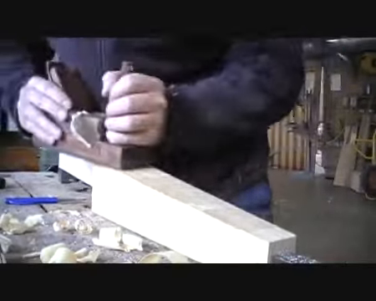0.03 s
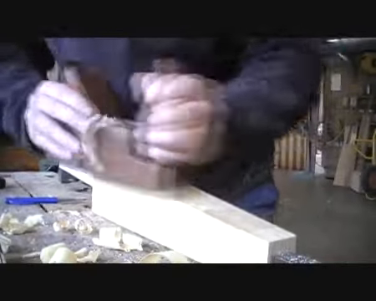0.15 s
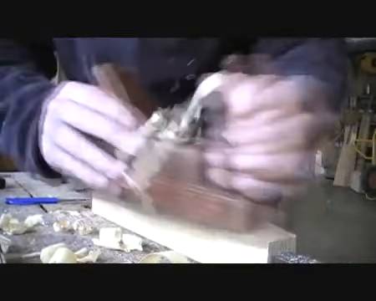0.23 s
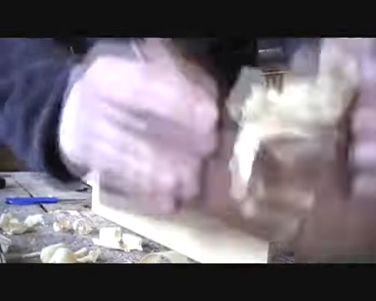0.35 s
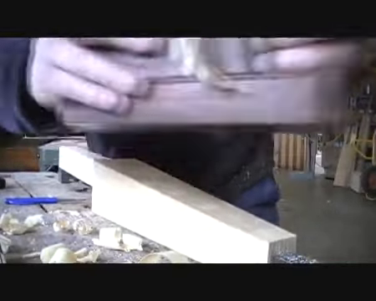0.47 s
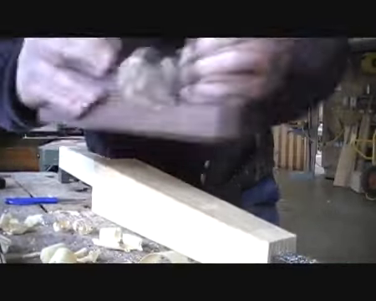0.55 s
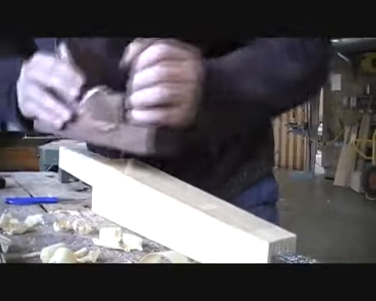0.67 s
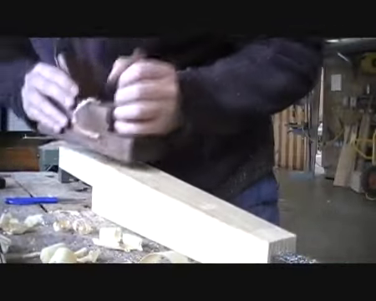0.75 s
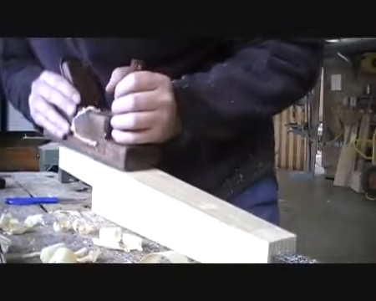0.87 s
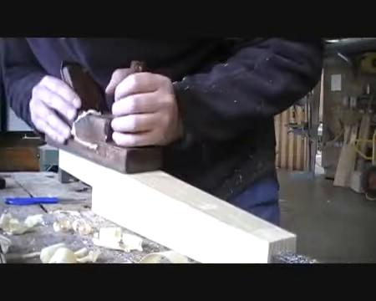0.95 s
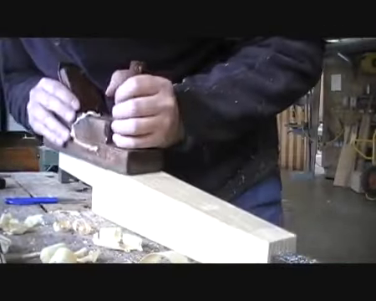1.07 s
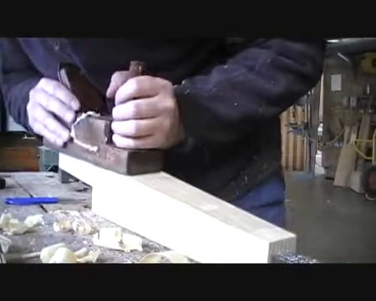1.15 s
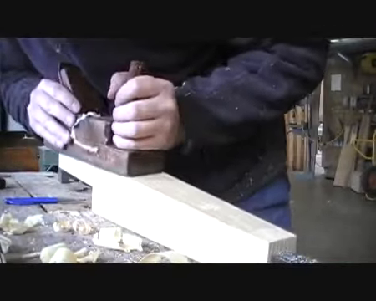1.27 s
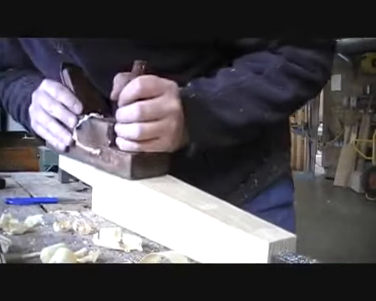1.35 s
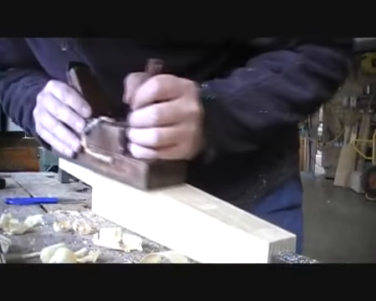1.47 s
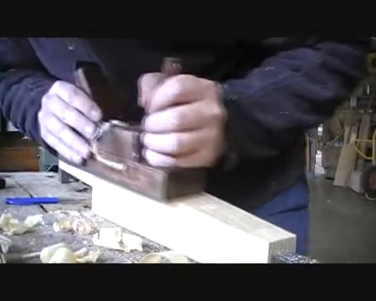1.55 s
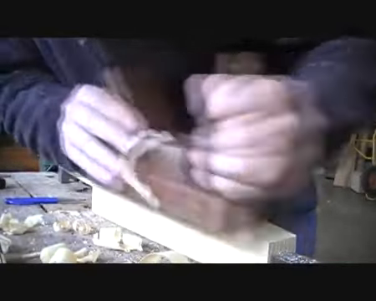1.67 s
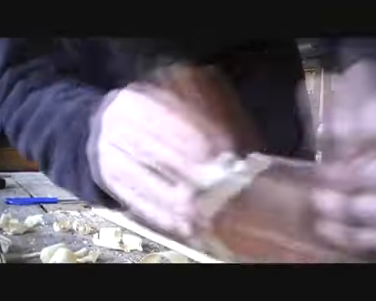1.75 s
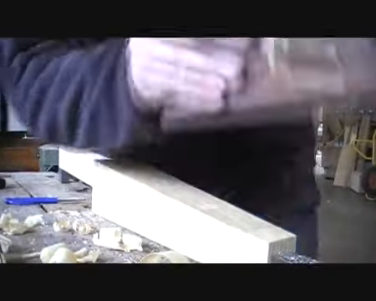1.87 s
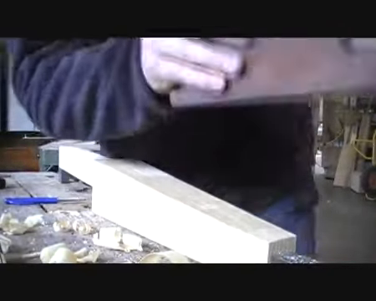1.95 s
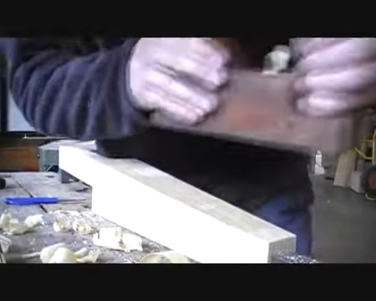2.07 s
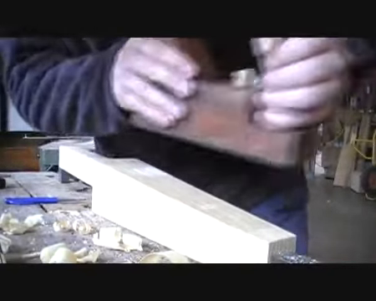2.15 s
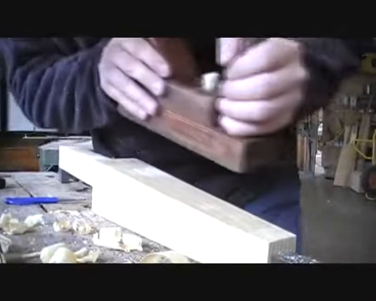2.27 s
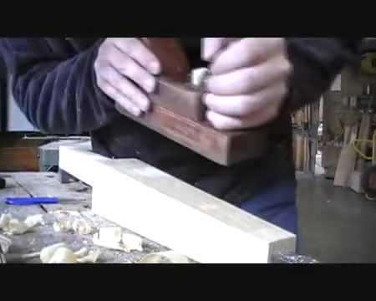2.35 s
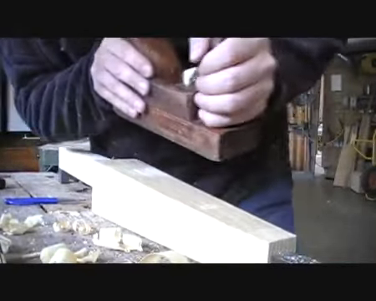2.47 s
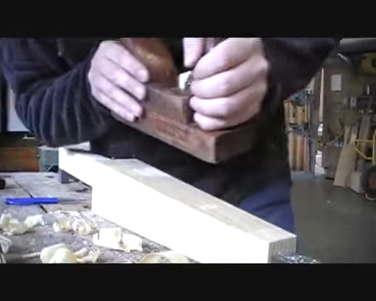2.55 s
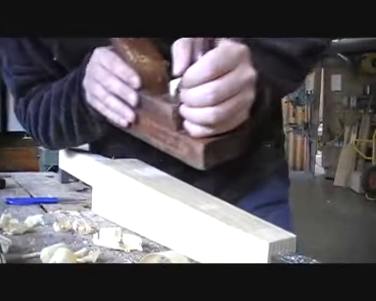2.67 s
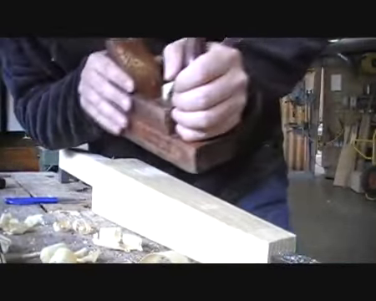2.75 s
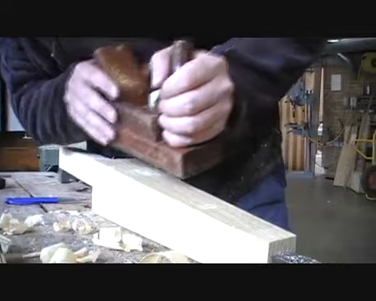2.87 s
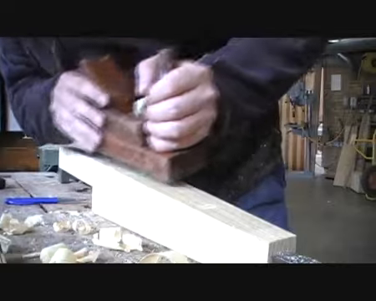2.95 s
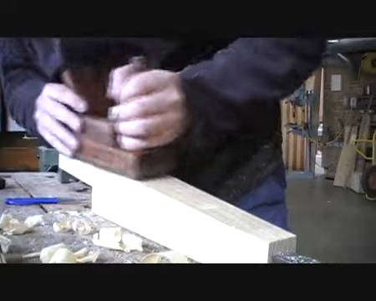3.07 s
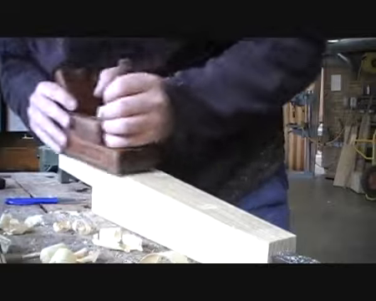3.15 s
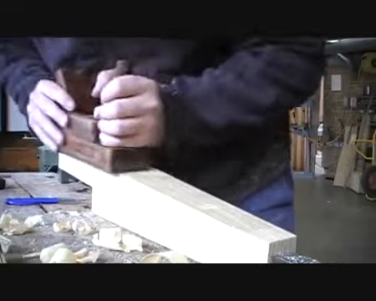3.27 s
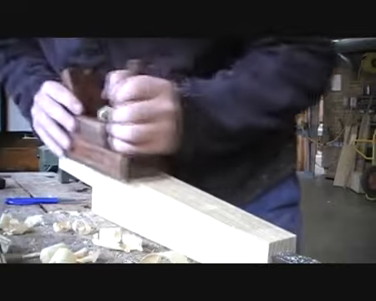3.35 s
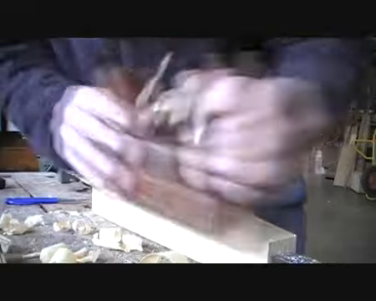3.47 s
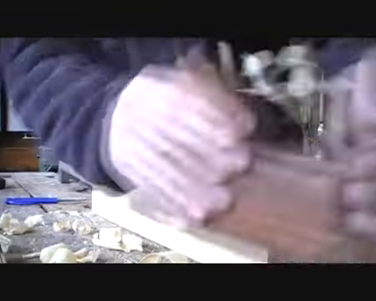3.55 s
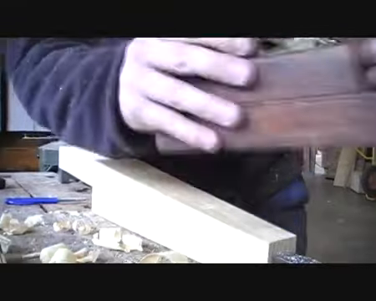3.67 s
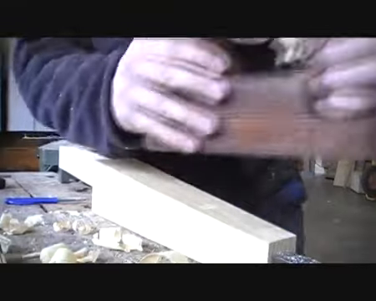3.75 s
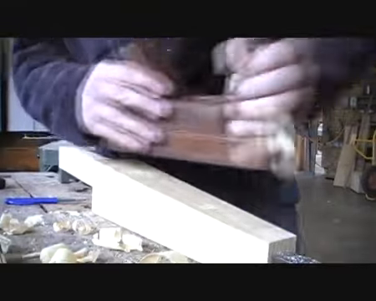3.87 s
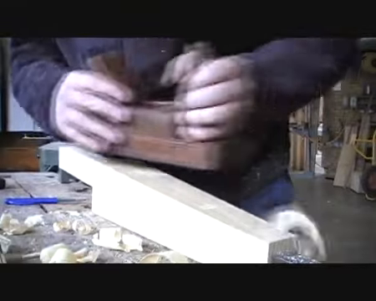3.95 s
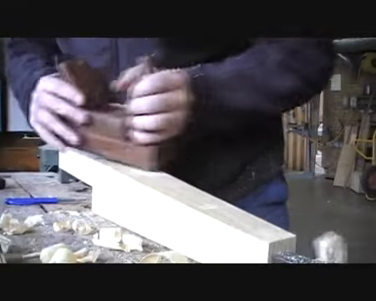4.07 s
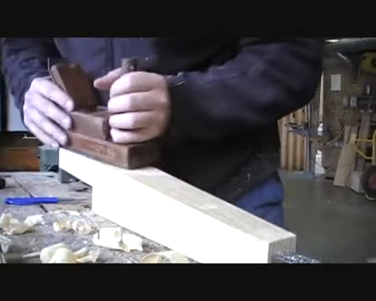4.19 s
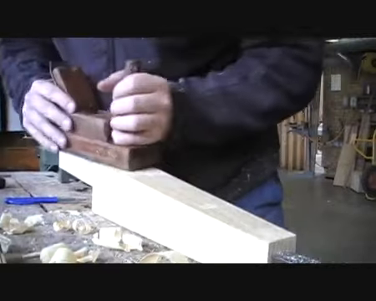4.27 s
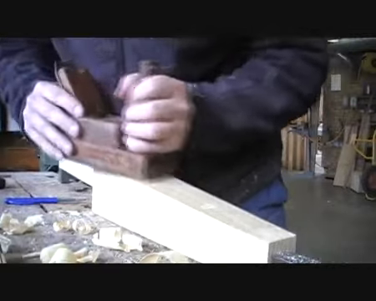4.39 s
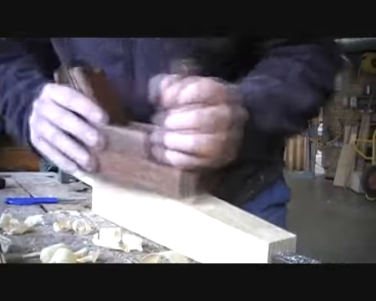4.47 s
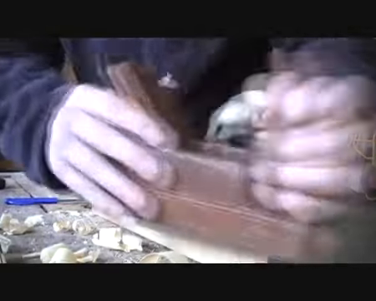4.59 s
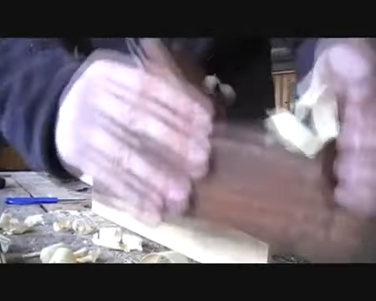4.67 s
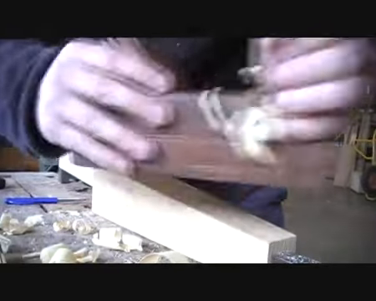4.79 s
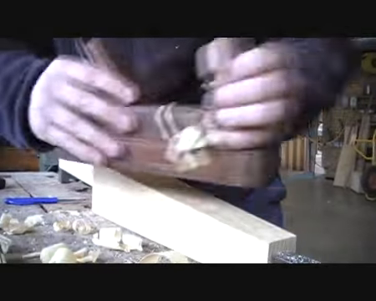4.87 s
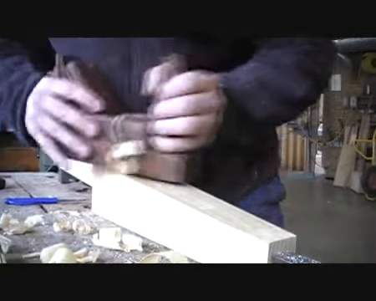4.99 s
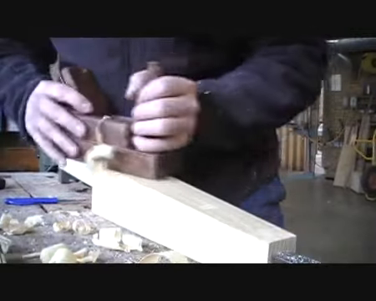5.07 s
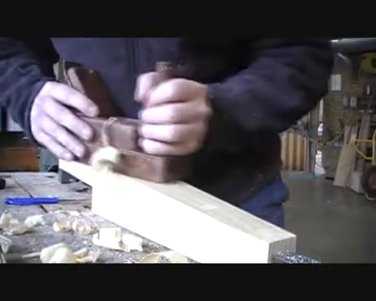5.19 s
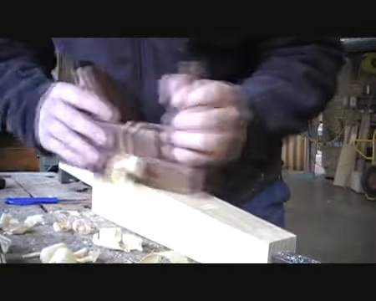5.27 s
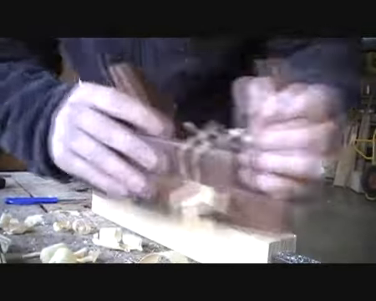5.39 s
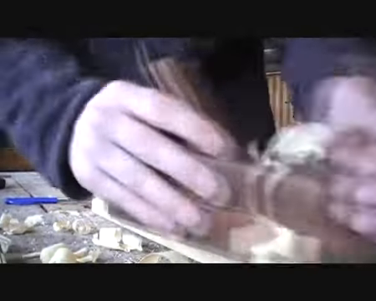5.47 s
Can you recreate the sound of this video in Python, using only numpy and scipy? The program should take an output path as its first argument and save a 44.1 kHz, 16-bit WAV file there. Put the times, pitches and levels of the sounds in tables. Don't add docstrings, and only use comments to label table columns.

```python
import sys
import numpy as np
from scipy import signal
from scipy.fft import rfft, irfft
from scipy.io import wavfile
from scipy.ndimage import uniform_filter1d

SR = 44100
rng = np.random.default_rng(int(sys.argv[2]) if len(sys.argv) > 2 else 0)


def put_to_file(sound):
    columns = np.atleast_2d(sound).T
    safe = np.clip(columns, -1, 1)
    whole_steps = np.round(safe * 32767)
    wavfile.write(sys.argv[1], SR, whole_steps.astype(np.int16))


def elevation(decibels):
    levels = np.asarray(decibels, float)
    return 10 ** (levels / 20)


N = 243873

# (frequency [Hz], level [dB], decay t60 [s])
BENCH_MODES = [(136, -6.5, 0.25), (160, -1.5, 0.17), (179, -4, 0.3), (200, -9.5, 0.07), (233, 0, .1),
               (259, -4, 0.16), (308, -6, 0.089)]
# (frequency [Hz], level [dB], decay t60 [s])
BLANK_MODES = [(359, 1.5, 0.072), (414.7, 5.5, 0.032), (468.2, -6.5, 0.12), (572, 8.5, 0.1),
               (638, 5.5, 0.086), (688, 4, 0.11), (718, 4, 0.056), (910, 8, 0.033), (997, 4.5, 0.061),
               (1096, -0.5, 0.075)]
# (frequency [Hz], level [dB], decay t60 [s])
BODY_MODES = [(1257, 11.5, 0.011), (1569, 3.5, 0.026), (1724, 5, 0.017), (1820, 9.5, 0.018),
              (1878, 5, 0.012), (2368, -26, 0.056), (2650, -5.5, 0.014)]
# (frequency [Hz], density [dB per Hz])
RUSTLE_COLOUR = [(180, -41), (420, -10), (953, -7), (1300, -2.5), (1620, -22.5), (1970, -8), (10800, -25.5),
                 (15500, -66.5)]


def evened(x):
    return x / np.sqrt(np.mean(x ** 2) + 1e-20)


def read(points, hz):
    f, value = np.transpose(points)
    return np.interp(np.log(hz + 1), np.log(f + 1), value)


def add(mix, s, sound):
    part = mix[..., max(round(s * SR), 0):][..., :sound.shape[-1]]
    part += sound[..., :part.shape[-1]]


def colour(x, points):
    return irfft(rfft(x) * elevation(read(points, np.fft.rfftfreq(len(x), 1 / SR))), len(x))


def resonate(x, hz, width):
    turn = np.exp(2j * np.pi * np.cumsum(hz * np.ones(len(x))) / SR)
    r = np.exp(-np.pi * width / SR)
    return 2 * (turn * signal.lfilter([1 - r], [1, -r], x / turn)).real


def band(x, hz, inner_hz, outer_hz):
    return evened(resonate(resonate(x, hz, inner_hz), hz, outer_hz))


def smooth_field(noise, bins, frames):
    return evened(uniform_filter1d(uniform_filter1d(noise, size=bins, axis=0), size=frames, axis=1))


def patchy(x, patch_db):
    z = signal.stft(x, nperseg=256, noverlap=192)[2]
    field = smooth_field(rng.standard_normal(z.shape), 3, 24)
    return evened(signal.istft(z * elevation(patch_db * field), nperseg=256, noverlap=192)[1][:len(x)])


def controls(rows):
    s, *columns = np.transpose(rows)
    t = np.arange(s[0], s[-1], 1 / SR)
    edge = np.clip(np.minimum(t - s[0], s[-1] - t) / 0.0017, 0, 1)
    return s[0], edge, [np.interp(t, s, c) for c in columns]


def ring(modes, damping=1, weights_db=0):
    hz, db, t60 = np.transpose(modes)[:, :, None]
    t = np.arange(SR // 4) / SR
    phase = 2 * np.pi * rng.random(hz.shape)
    decay = elevation(db + weights_db - 60 * t * damping / t60)
    build_up = 1 - np.exp(-t * hz / 0.16)
    h = (decay * np.sin(2 * np.pi * hz * t + phase) * build_up).sum(0)
    return h / np.linalg.norm(h)


def tearing(size, per_s, spread_db, lumps_db):
    chance, sign, strength = rng.random((size, 3)).T
    clicks = (chance < per_s / SR) * np.sign(sign - .5) * elevation(-spread_db * np.log(strength + 0.0018))
    lumps = evened(uniform_filter1d(rng.standard_normal(size), size=300))
    return evened(clicks * elevation(lumps_db * lumps))


def strokes():
    # (time [s], bite of the iron [dB], load of the hands on the blank [dB])
    pushes = [
        [(0.236, -57, -24), (0.244, -29.5, -25), (0.262, -28, -24), (0.382, -15, -53), (0.428, -17, -24),
         (0.458, -20.5, -44), (0.468, -46, -51)],
        [(1.375, -60, -42.5), (1.497, -48, -42), (1.56, -49, -37.5), (1.621, -44.5, -34), (1.663, -43.5, -32.5),
         (1.739, -32.5, -34.5), (1.817, -28, -37.5), (1.85, -43, -28), (1.87, -39, -34)],
        [(3.475, -44.5, -30.5), (3.533, -28, -33), (3.548, -25.5, -30), (3.577, -23.5, -58), (3.623, -20, -57),
         (3.67, -39, -24)],
        [(4.39, -60, -52.5), (4.5, -58, -46), (4.52, -56.5, -36.5), (4.61, -38.5, -27), (4.645, -22.5, -26.5),
         (4.705, -21, -31.5), (4.74, -18, -31), (4.77, -20, -49), (4.79, -43, -24)],
        [(5.32, -49, -21), (5.338, -36.5, -31), (5.412, -29.5, -25), (5.506, -21.5, -20), (5.53, -21, -23)],
    ]
    bench_load = [-4, -8, -5, -4.5, -11]
    out = np.zeros(N)
    for rows, bench_db in zip(pushes, bench_load):
        s, edge, (cut_db, load_db) = controls(rows)
        hz = 5420 - 5.5 * (cut_db + 17.0)
        body_db = -3.5 + 0.66 * cut_db + 0.34 * load_db
        add(out, s, edge * iron(tearing(len(hz), 6000, 1.4, 0.7), cut_db, hz))
        shaken = (BODY_MODES, body_db, 1.3), (BLANK_MODES, load_db, 2.5), (BENCH_MODES, load_db + bench_db, 2.5)
        for modes, db, damping in shaken:
            shake = edge * elevation(db) * tearing(len(hz), 2500, 1.8, 1.5)
            add(out, s, signal.fftconvolve(shake, ring(modes, damping)))
    return out


def breakouts():
    # (time [s], peak [dB], length [ms], upper ring [dB])
    exits = [
        (1.908, 0, 7.5, -1.5),
        (3.689, -1, 9.4, -2),
    ]
    out, t = np.zeros(N), np.arange(-.04, .04, 1 / SR)
    for s, db, ms, upper_db in exits:
        swell = np.exp(-(t * 1000 / ms) ** 2)
        splinters = tearing(len(t), 9000, 1.2, 1.2)
        upper = evened(resonate(resonate(splinters, 7620, 950), 8600, 1800))
        add(out, s - .04, swell * iron(splinters, db - 12.5, 5410))
        add(out, s - .04, swell * elevation(db - 26.5 + upper_db) * upper)
    return out


def iron(drive, cut_db, hz):
    # (frequency [Hz], width [Hz], level [dB])
    iron_bands = [(3700, 780, -12), (4630, 250, -11.5), (6120, 200, -10), (6780, 570, -17.5),
                  (8510, 440, -13.5), (10800, 2000, -11.5)]
    # (frequency [Hz], density [dB per Hz])
    fibre_colour = [(1470, -1.5), (2500, -4.5), (3220, -6), (5410, -3.5), (8950, -4.5), (13800, -36.5),
                    (15200, -35.5), (15500, -66)]
    rings = sum(elevation(db) * band(drive, f, w, 3 * w) for f, w, db in iron_bands)
    main = band(drive, hz, 450, 1700) * elevation(0.81 * (cut_db + 23.5))
    fibres = evened(colour(drive, fibre_colour))
    return elevation(cut_db) * patchy(elevation(9.0) * fibres + elevation(3.5) * main + rings, 3.6)


def chatter():
    # (start [s], fastest [s], end [s], top rate [Hz], top level [dB])
    skipping = [
        (0.291, 0.419, 0.47, 1990, -21),
        (1.645, 1.76, 1.95, 1553, -35),
        (3.484, 3.604, 3.714, 1330, -22.5),
        (4.561, 4.756, 4.79, 1820, -29.5),
        (5.361, 5.496, 7.5, 1640, -26.5),
    ]
    out, wood = np.zeros(N), ring([*BLANK_MODES, *BODY_MODES], 0.57)
    for s, top, end, hz, db in skipping:
        glide = [(s, 0.533 * hz, db - 11), (top, hz, db), (end, 0.55 * hz, db - 17.5)]
        s, edge, (hz, db) = controls(glide)
        skips = tearing(len(hz), 2500, 2.3, 2.7)
        tone = band(skips, hz, 300, 470.0) + .5 * evened(resonate(skips, hz / 2, 119.5))
        lit = evened(signal.fftconvolve(tone, wood)[:len(hz)])
        add(out, s, edge * elevation(db) * evened(2.1 * tone + lit))
    return out


def groans():
    # (time of the top [s], rms level [dB], frequency [Hz], half length [ms])
    catches_of_mode = [(0.271, -28, 300, 18), (.3, -18, 1230, 12), (.36, -24.5, 3850, 41),
                       (0.408, -23.5, 2670, 31), (0.5, -25.5, 610, 3.9), (1.618, -20, 362, 23),
                       (1.612, -33.5, 1070, 14), (3.228, -21, 368, 12), (3.212, -16, 689, 10),
                       (3.262, -27, 700, 16), (3.338, -27.5, 590, 17.6), (3.385, -32.5, 712, 22),
                       (0.0605, -25.5, 1600, 3.1), (0.082, -27, 1750, 6), (0.084, -30, 820, 8),
                       (5.228, -23, 990, 15), (5.352, -22, 590, 14), (5.385, -29, 1900, 25),
                       (0.275, -20, 740, 12), (3.648, -29, 382, 8.9), (3.9, -45.5, 970, 17),
                       (3.212, -20.5, 960, 8), (1.66, -34.5, 1060, 26), (2, -38, 340, 12),
                       (1.615, -23.5, 634, 20.6), (1.791, -32.5, 770, 37), (3.547, -17, 362, 9.9),
                       (3.552, -15, 758, 10.4), (4.532, -30.5, 167, 28), (4.63, -23.5, 614, 5.9),
                       (4.636, -21, 1740, 4.3), (4.745, -26, 540, 12.5), (5.425, -20.5, 737, 23)]
    out, t = np.zeros(N), np.arange(-.1, .1, 1 / SR)
    for s, db, hz, ms in catches_of_mode:
        noise = rng.standard_normal(len(t))
        waver = .7 * evened(uniform_filter1d(noise, size=400)) * (hz / 700) ** .7
        swell = np.exp(-(t * 1000 / (ms * np.where(t < 0, .55, 1.45))) ** 2)
        add(out, s + t[0], np.sqrt(2) * elevation(db) * swell * np.sin(2 * np.pi * hz * t + waver))
    return out


def landings():
    # (time [s], peak [dB], favoured blank mode [Hz], bench level [dB], favoured bench mode [Hz])
    blows = [(0.002, -38, 592, 1, 160), (0.059, -12, 572, 2, 160), (0.079, -15, 773, -1, 259),
             (1.057, -18.5, 683, -3, 160), (1.082, -23, 573, 1, 160), (3.206, -7.5, 702, -10, 200),
             (3.223, -13, 378, -4, 150), (3.328, -23.5, 580, -1, 152), (4.268, -35, 644, 15.5, 179),
             (4.288, -33.5, 404, -1, 179), (5.198, -9, 572, 3.5, 200), (5.215, -8, 970, -5, 233),
             (5.233, -10, 566, -5, 233), (5.311, -7, 657, -7, 233)]
    return knocks(blows, body_db=-14.5, ms=1.25)


def catches():
    # (time [s], peak [dB], favoured blank mode [Hz], bench level [dB], favoured bench mode [Hz])
    blows = [(0.246, -15.5, 730, -4.5, 160), (0.265, -10.5, 331, -8, 136), (0.311, -10, 1100, -37, 160),
             (0.418, -12, 720, -30, 160), (0.795, -29.5, 547, -19, 259), (1.386, -39.5, 647, 3.5, 136),
             (1.606, -26, 1080, -6.5, 160), (1.827, -24, 900, -20, 160), (1.907, -12, 580, -1, 233),
             (1.924, -14, 462, 2, 245), (2.937, -46, 997, -20, 200), (3.081, -46.5, 312, -14, 200),
             (3.48, -26.5, 1090, 2.5, 160), (3.543, -10, 997, -13, 179), (3.688, -16, 621, -13, 200),
             (4.509, -33.5, 900, 12, 143)]
    return knocks(blows, body_db=-2, ms=1.317)


def knocks(blows, body_db, ms):
    out, t = np.zeros(N), np.arange(1500) / SR
    blank_hz, bench_hz = np.array(BLANK_MODES)[:, :1], np.array(BENCH_MODES)[:, :1]
    u = t * 1000 / ms
    push = u * np.exp(-u)
    for s, db, hz, bench_db, bench_top_hz in blows:
        rattle = push * (1.2 + rng.standard_normal(len(t)))
        blank_mix = 11.5 * np.exp(-(np.log(blank_hz / hz) / .09) ** 2)
        bench_mix = 3 * rng.standard_normal((len(BENCH_MODES), 1))
        bench_mix = bench_mix + 7.5 * np.exp(-(np.log(bench_hz / bench_top_hz) / .08) ** 2)
        body_mix = 3 * rng.standard_normal((len(BODY_MODES), 1))
        parts = ((BENCH_MODES, bench_db - 0.5, bench_mix, push), (BLANK_MODES, 0, blank_mix, rattle),
                 (BODY_MODES, body_db, body_mix, rattle))
        for modes, part_db, weights_db, drive in parts:
            sound = signal.fftconvolve(ring(modes, 0.75, weights_db), drive)
            add(out, s - ms / 1000, elevation(db + part_db) * sound / abs(sound).max())
        add(out, s - ms / 1000, elevation(db - 8.5) * thud())
    return out


def thud():
    # (frequency [Hz], density [dB per Hz])
    thud_colour = [(60, -30.5), (130, -6), (300, -0.5), (700, 10), (1080, -7), (1400, -12), (3000, -34),
                   (12000, -53.5)]
    t60 = 0.083
    t = np.arange(8192) / SR
    noise = colour(rng.standard_normal(len(t)), thud_colour)
    sound = noise * elevation(-60 * t / t60) * np.minimum(t / 0.0006, 1)
    return sound / abs(sound).max()


def cracks():
    # (time [s], peak [dB], colour [Hz], decay t60 [ms])
    crack_list = [(0.055, -29, 11000, 12), (0.0575, -3, 9000, 3.7), (0.0705, -28, 10500, 22),
                  (0.08, -26.5, 1880, 28), (0.246, -17.5, 4000, 18), (0.26, -21, 6400, 12),
                  (0.27, -20, 7000, 12), (0.28, -14, 8160, 17), (0.284, -14, 5450, 12),
                  (1.058, -24.5, 2700, 11.5), (1.3853, -45.5, 8510, 16), (2.937, -41.5, 4640, 15),
                  (3.083, -46, 2000, 15), (3.2056, -21, 5460, 15), (3.223, -44, 4500, 13),
                  (3.314, -41, 3250, 14), (3.479, -35, 3500, 16), (4.2665, -30.5, 5600, 12),
                  (4.2702, -26, 2830, 10.3), (5.198, -13, 5380, 14.3), (5.233, -17.5, 6940, 15),
                  (5.238, -26.5, 1890, 19)]
    return ticks([(s, db, hz, -3, ms) for s, db, hz, ms in crack_list], octaves=0.55)


def snaps():
    # (time [s], peak [dB], colour [Hz], left against right [dB], decay t60 [ms])
    snap_list = [(0.5156, -11, 4800, -6, 12.4), (0.521, -29.5, 6530, 0, 15), (0.53, -33, 10000, 0, 25),
                 (0.6349, -16.5, 6200, -8, 10.6), (0.6395, -19, 7000, -11, 14), (0.645, -28, 7500, -14, 14),
                 (0.722, -50, 9100, -6, 15), (0.7445, -37, 9620, -14, 32), (0.795, -18, 4600, -9.5, 11.3),
                 (0.7959, -21.5, 1108, -15, 20), (0.801, -35, 7020, -13, 33), (0.824, -33, 4000, -8, 12),
                 (0.846, -40, 5500, -12, 28), (0.883, -32, 6300, -5, 18), (0.9675, -47, 8100, -7, 30),
                 (1.012, -48, 8480, -3, 18), (2.685, -47.5, 5050, -8, 15), (2.8677, -45.5, 8100, -2.5, 16),
                 (2.9486, -40.5, 7600, -3, 15), (2.973, -46.5, 6930, 0, 15),
                 (3.7656, -20.5, 3060, -2, 17.6), (4.1143, -32, 5000, -3, 12), (4.2804, -32, 8040, 2, 15),
                 (4.291, -30, 11000, -3, 20), (4.314, -33, 12000, 0, 27), (4.954, -39.5, 4520, -10, 15)]
    return ticks(snap_list, octaves=0.6)


def ticks(rows, octaves):
    out, t = np.zeros((2, N)), np.arange(2048) / SR
    bins_hz = np.fft.rfftfreq(len(t), 1 / SR) + 1
    for s, db, hz, left_db, ms in rows:
        shape = np.exp(-(np.log2(bins_hz / hz) / (1.36 * octaves)) ** 2 - (bins_hz / 13200) ** 4)
        rise = .1 * ms / 1000
        decay = elevation(-60 * t * 1000 / ms) + 18 / ms * elevation(-60 * t / 0.0032)
        burst = irfft(rfft(rng.standard_normal(len(t))) * shape) * decay * np.minimum(t / rise, 1)
        sides_db = np.array([[.5], [-.5]]) * left_db
        add(out, s - rise, elevation(db + sides_db) * burst / abs(burst).max())
    return out


def rustle():
    # (start [s], end [s], first level [dB], last level [dB])
    settling = [(0.0, 0.044, -67, -57), (0.078, 0.24, -65, -55.5), (0.47, 1.042, -44, -65.5),
                (1.071, 1.374, -68.5, -67), (3.22, 3.481, -69, -59), (5.204, 5.327, -50, -56),
                (1.837, 2.497, -48, -69), (2.98, 3.19, -72.5, -70.5), (3.659, 4.237, -53, -60.5),
                (4.801, 5.181, -52, -61)]
    out = np.zeros(N)
    for s, end, first_db, last_db in settling:
        s, edge, (db,) = controls([(s, first_db), (end, last_db)])
        paper = colour(tearing(len(db), 5000, 0.84, 2.2), RUSTLE_COLOUR)
        add(out, s, edge * elevation(db + 6.0) * patchy(paper, 1.4))
    return out


def sole_slide():
    # (time [s], whistle level [dB], whistle frequency [Hz], hiss level [dB])
    slide = [(4.268, -48, 8400, -43.5), (4.3, -52, 8000, -46), (4.322, -42, 8400, -51),
             (4.36, -61, 8050, -55), (4.405, -53, 8300, -61), (4.43, -44, 8500, -58),
             (4.47, -61, 8000, -62), (4.55, -47.5, 7900, -52.5), (4.62, -50, 7400, -53)]
    out = np.zeros(N)
    s, edge, (db, hz, hiss_db) = controls(slide)
    noise = tearing(len(db), 12000, 1.5, 1.5)
    whistle = elevation(db) * band(noise, hz, 1000, 2300)
    hiss = patchy(colour(noise, [(1500, 0), (4000, -3.5), (12500, -1), (15000, -11.5)]), 3.5)
    add(out, s, edge * (whistle + elevation(hiss_db) * hiss))
    return out


def sleeves():
    # (time of the top [s], level [dB], half length [s])
    brushes = [(0.78, -58, 0.099), (2.296, -54, 0.078), (3.796, -49.5, 0.055), (4.054, -55, 0.15),
               (5.101, -59, 0.13)]
    # (frequency [Hz], width [Hz], level [dB])
    cloth_bands = [(1364, 360, -7), (2920, 770, -1)]
    out, t = np.zeros(N), np.arange(-.25, .25, 1 / SR)
    for s, db, half in brushes:
        cloth = tearing(len(t), 9900, 1.7, 0.81)
        bands = sum(elevation(band_db) * band(cloth, f, w, 2 * w) for f, w, band_db in cloth_bands)
        brush = bands + 1.14 * evened(colour(cloth, RUSTLE_COLOUR))
        add(out, s + t[0], elevation(db) * np.exp(-(t / half) ** 2) * brush)
    return out


def ports(x):
    # (frequency [Hz], level [dB])
    left_level = [(60, -7.5), (130, -5.5), (290, -9.5), (640, -8), (1410, -2), (3100, -2), (6820, 0),
                  (15000, -4)]
    # (frequency [Hz], phase [radians])
    left_lead = [(0, 0.52), (1030, 0.55), (1640, 0.55), (4310, 0.19), (8350, -0.35), (8870, -1.2),
                 (13000, -0.36), (15200, -0.0023)]
    hz = np.fft.rfftfreq(N, 1 / SR)
    left = elevation(read(left_level, hz) / 2) * np.exp(.5j * read(left_lead, hz))
    pair = np.array([left, 1 / left])
    return irfft(rfft(x) * pair / abs(pair.mean(0)), N)


def scattered(x):
    # (frequency [Hz], level against the direct sound [dB])
    scatter = [(30, -15.5), (90, -13), (170, -20), (400, -14.5), (2000, -12), (5000, -22.5), (8500, -10),
               (13000, -12)]
    hz, t, z = signal.stft(x, SR, nperseg=512)
    real, imag = (uniform_filter1d(rng.standard_normal(z.shape), size=4, axis=0) for _ in range(2))
    drift = real + 1j * imag
    z = z * drift / abs(drift) * elevation(read(scatter, hz))[:, None]
    return np.outer([1, -1], signal.istft(z, nperseg=512)[1][:N])


def shop(x):
    # (frequency [Hz], t60 [s])
    shop_t60 = [(100, 0.98), (200, 1.18), (400, 1.36), (1500, 0.84), (5000, 0.47), (12000, 0.46)]
    # (frequency [Hz], level [dB])
    wet = [(150, -10), (270, -8), (700, -10.5), (4300, -10.5), (5450, -21.5), (6800, -10.5), (8500, -17.5),
           (12000, -14)]
    taps = np.zeros((2, SR))
    at = np.arange(60, SR - 20, 20) + rng.integers(0, 20, (2, (SR - 61) // 20))
    np.put_along_axis(taps, at, rng.choice([-1., 1.], at.shape), 1)
    taps[1] = .35 * taps[0] + .94 * taps[1]
    hz, t, z = signal.stft(taps, SR, nperseg=512)
    decay = elevation(-60 * t / read(shop_t60, hz)[:, None]) + 0.65 * elevation(-60 * t / 0.11)
    tail = signal.istft(z * decay, SR, nperseg=512)[1]
    return signal.fftconvolve(colour(x, wet)[None], tail / np.linalg.norm(tail[0]), axes=1)[:, :N]


def quiet_floor():
    # (frequency [Hz], density [dB per Hz])
    floor_colour = [(15, -53), (60, -17.5), (150, -10.5), (896, -13.5), (4000, -25), (10000, -29),
                    (13500, -35.5), (15300, -48.5)]
    # (frequency [Hz], correlation [-1 to 1])
    likeness = [(60, 0.18), (240, 0.24), (950, 0.19), (3770, 0.24), (15000, 0.455)]
    # (frequency [Hz], level [dB])
    floor_left = [(60, -13), (240, -13.5), (950, -3), (3770, -1.5), (15000, -1)]
    frames, hz = N // 256 + 5, np.fft.rfftfreq(1024, 1 / SR)
    a, b, c, d, patches = rng.standard_normal((frames, 513, 5)).T
    patches = smooth_field(patches, 10, 12)
    same = np.clip(read(likeness, hz), -1, 1)[:, None]
    left = a + 1j * b
    z = np.array([left, same * left + np.sqrt(1 - same ** 2) * (c + 1j * d)])
    sides_db = np.outer([.5, -.5], read(floor_left, hz))[:, :, None]
    z *= elevation(read(floor_colour, hz)[:, None] + 0.42 * patches + sides_db)
    return elevation(-56) * evened(signal.istft(z, nperseg=1024, noverlap=768)[1][:, :N])


def hum():
    # (frequency [Hz], rms level [dB])
    lines = [(102.3, -69), (199.2, -64), (398.4, -65), (500.6, -71), (786.0, -74), (1459, -74), (2191, -67),
             (4377, -85), (10702, -88), (15622, -84)]
    t = np.arange(N) / SR
    waver = .15 * evened(uniform_filter1d(rng.standard_normal(N), size=9000))
    return sum(np.sqrt(2) * elevation(db) * np.sin(2 * np.pi * (f * t + rng.random()) + waver) for f, db in lines)


def scene():
    wood = strokes() + breakouts() + chatter() + groans() + landings() + catches()
    wood = wood + rustle() + sole_slide() + sleeves()
    wood = signal.sosfilt(signal.butter(2, 125, "high", fs=SR, output="sos"), wood)
    wood = signal.sosfilt(signal.butter(10, 14400, fs=SR, output="sos"), wood)
    dry_ticks = cracks() + snaps()
    near = ports(wood + shop(wood + dry_ticks.mean(0))) + dry_ticks + scattered(wood)
    return near + quiet_floor() + hum()


def treble_dipped(x):
    # (start [s], end [s], dips above [Hz])
    treble_dips = [(0.05, 0.056, 2500), (0.234, 0.238, 2500), (0.782, 0.782, 4200), (1.047, 1.054, 900),
                   (3.199, 3.204, 900), (5.191, 5.194, 900), (4.253, 4.264, 4200)]
    t, out = np.arange(N) / SR, x.copy()
    for s, end, hz in treble_dips:
        treble = signal.sosfiltfilt(signal.butter(4, hz, "high", fs=SR, output="sos"), x)
        out -= .8 * treble * np.clip(np.minimum(t - s, end - t) / .001, 0, 1)
    return out


def top_cut(x):
    return signal.sosfilt(signal.butter(12, 15670, fs=SR, output="sos"), x)


def record(dry):
    mix = 1.266 * np.tanh(treble_dipped(dry) / 1.318)
    return top_cut(mix)


dry = scene()
out = record(dry)
put_to_file(out)
```